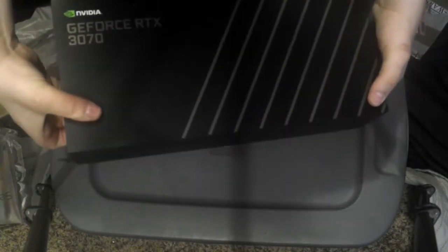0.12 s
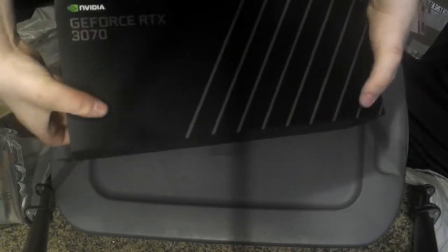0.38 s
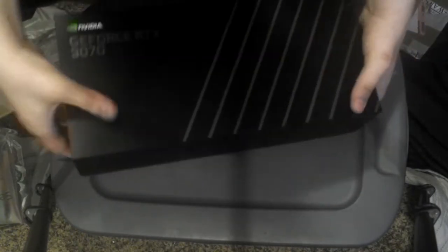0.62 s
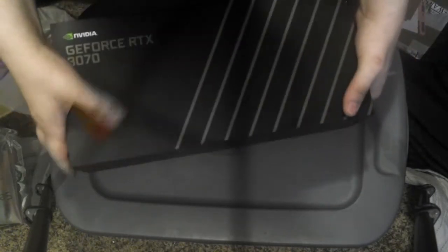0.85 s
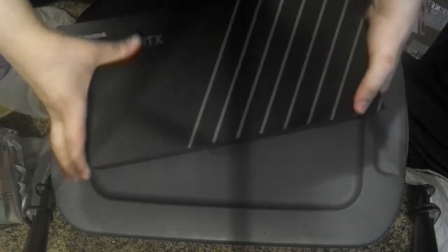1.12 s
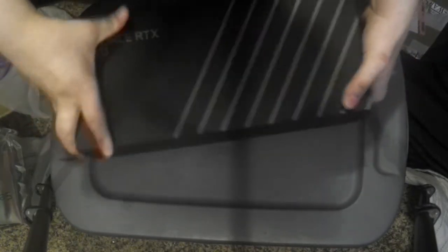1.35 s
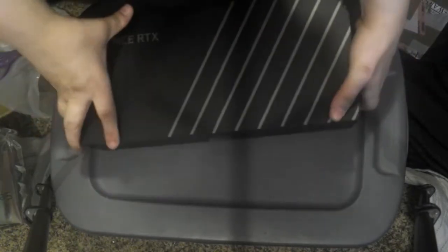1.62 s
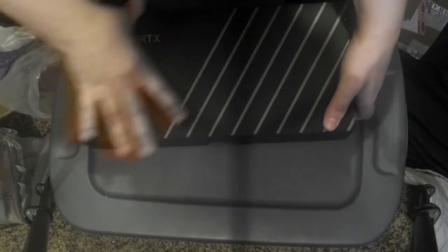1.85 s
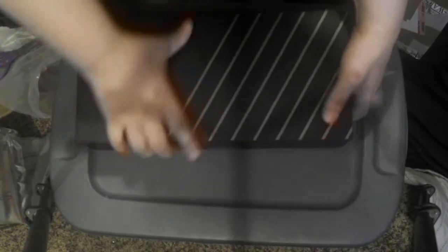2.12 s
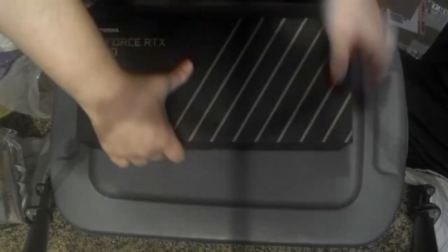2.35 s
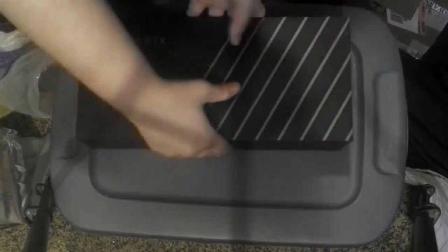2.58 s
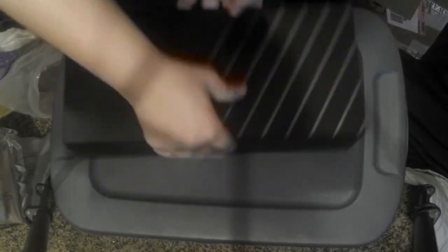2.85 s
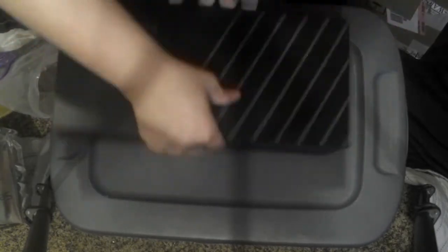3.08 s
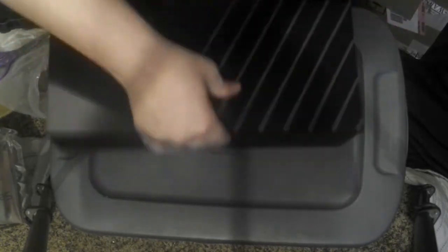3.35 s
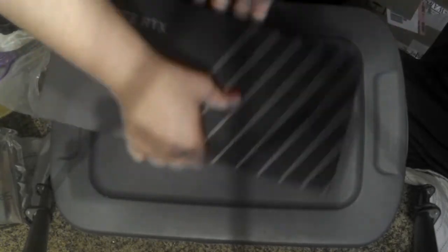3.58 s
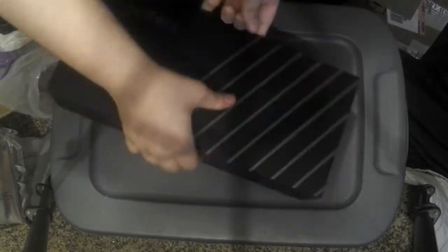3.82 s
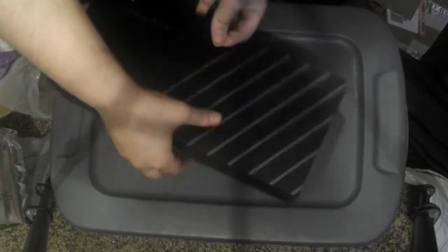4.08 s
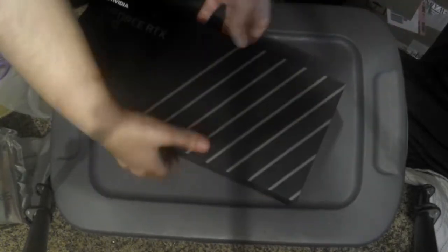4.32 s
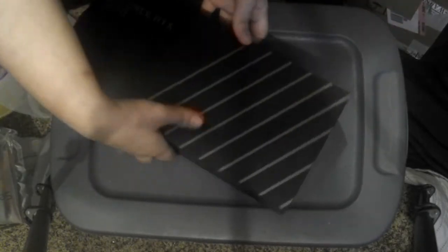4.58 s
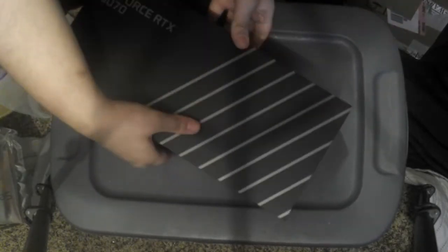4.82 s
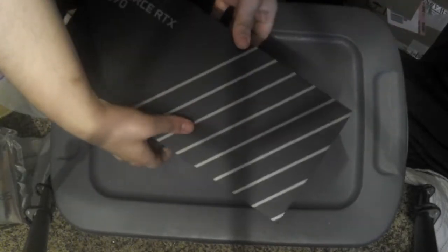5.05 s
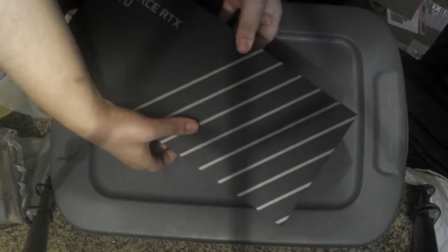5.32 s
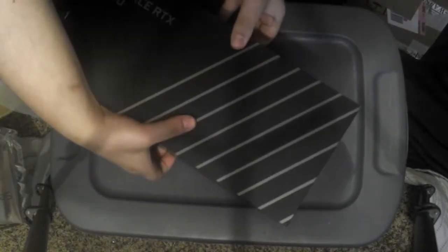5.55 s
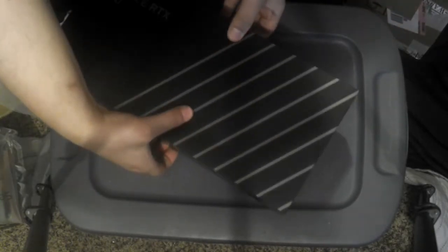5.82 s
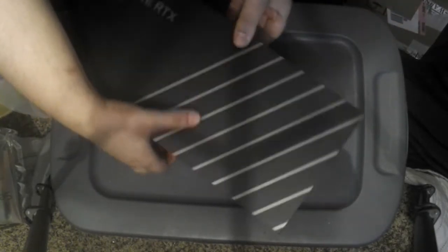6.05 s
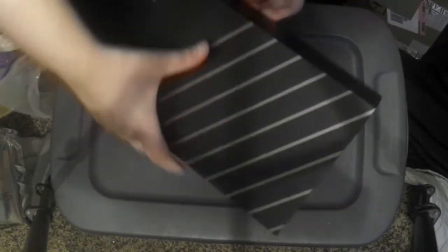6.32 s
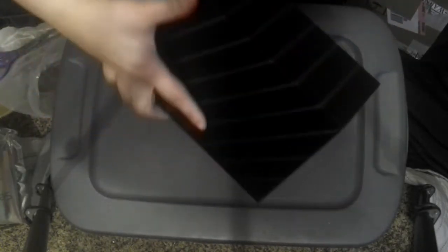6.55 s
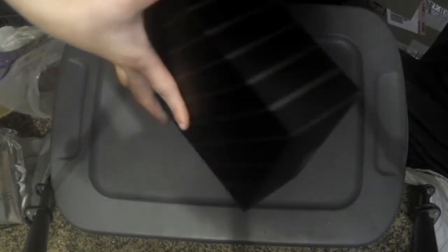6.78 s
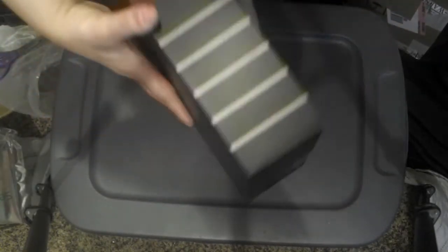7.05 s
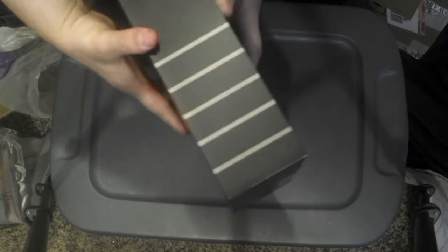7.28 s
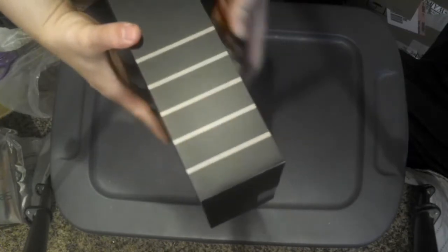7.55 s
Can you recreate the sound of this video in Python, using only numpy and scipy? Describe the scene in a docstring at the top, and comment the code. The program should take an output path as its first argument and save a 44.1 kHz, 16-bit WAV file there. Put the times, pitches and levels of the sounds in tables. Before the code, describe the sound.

Close hollow knocks and papery sliding of a box handled on a plastic tub lid, then quiet soft shifts over low fan noise.

```python
"""A cardboard box is tapped, rocked, set down and turned by hand on a hollow plastic lid, close to a small microphone.
Each contact is a first touch and a brief chatter that ring damped modes of the lid and the box panels.
Noise clicks make the snaps of corners and nails; uneven slips and a papery rasp make the sliding.
A small soft room answers with a short noise tail.
Behind it a fan hums in wandering tones and blows coloured noise, over the hiss of the preamplifier."""
import sys
import numpy as np
from scipy import signal
from scipy.fft import rfft, irfft, next_fast_len
from scipy.io import wavfile
from scipy.ndimage import uniform_filter1d

SR = 44100
rng = np.random.default_rng(int(sys.argv[2]) if len(sys.argv) > 2 else 0)


def makeup_ratio(level_db):
    """Linear amplitude ratio for a level in decibels (20 dB per factor of ten)."""
    decades = np.asarray(level_db, float) / 20
    return 10 ** decades


def materialize(psi):
    """Save the field psi as 16-bit PCM at rate SR to the path in sys.argv[1].

    A 1-D psi becomes a single channel; in a 2-D psi each row is a channel.
    """
    bounded = np.clip(np.atleast_2d(psi).T, -1, 1)
    quanta = np.round(bounded * 32767).astype(np.int16)
    wavfile.write(sys.argv[1], SR, quanta)


N = 337806  # length in samples

# Contacts of box and lid. Each row: start in seconds, peak level of the louder panel in dB,
# place in dB (upper panels over low panel), hardness in dB (knock against the panels).
CONTACTS = [(1.222, -42.5, -17, -9.5), (1.559, -17.5, -5, -9.5), (1.571, -28.5, -2, -6),
            (1.58, -29, -3, -6.5), (1.598, -32, 13, -20), (1.69, -32.5, -5.5, -10),
            (1.822, -31.5, 3.5, -13), (2.138, -44.5, -3, -2.5), (2.152, -41.5, -13, -13),
            (2.197, -32, -13, -19), (2.215, -37.5, -1, -7), (2.235, -44, 3, -14), (2.559, -32.5, 4, -8.5),
            (2.584, -37.5, -11, -7), (2.6, -23, -12, -20), (2.841, -43, -9, -16), (2.895, -32.5, 6, -14),
            (2.908, -19.5, 4.5, -12), (3.002, -31, -7, -37), (3.024, -25.5, -12, -37),
            (3.038, -27.5, -4.5, -28), (3.093, -14, 2, -13.5), (3.115, -19, -1.5, -14.5),
            (3.185, -34, 2, -32), (3.203, -25, -13, -26), (3.232, -25.5, 3, -30), (3.262, -25, 19, -19),
            (3.283, -17, 2.5, -17), (3.301, -25, 1, -17), (3.375, -26, -7, -27), (3.431, -26.5, 0, -14),
            (3.456, -16, 2.5, -15), (3.475, -27.5, 16, -11), (3.625, -39.5, -7, -9), (3.73, -38.5, 4, -17),
            (3.804, -30.5, 7, 0), (3.82, -32, -5, -16), (3.85, -40, 2, -26), (3.916, -27.5, -5, -11.5),
            (4.05, -31.5, -5, -22), (4.062, -30.5, 4, -14), (4.084, -8.5, -10, -11),
            (4.112, -5.5, -0.5, -3.5), (4.12, -3.2, 18, -12), (4.132, -26, -3, -1),
            (4.148, -17.5, -1.5, -14), (4.16, -21, 1, -1.5), (4.183, -23.5, 18, -9.5),
            (4.206, -34.5, 17, -10), (4.365, -25.5, -6.5, -10.5), (4.38, -29.5, -3, -6),
            (4.501, -35.5, -4.5, -17), (4.522, -39, -10, -14), (4.575, -35.5, -14, -18),
            (4.758, -20, 3, -17), (4.79, -39, 18, -9), (6.311, -33.5, -10, -35), (7.016, -34, -22, -17.5),
            (7.06, -37, -3, -15), (7.09, -39, -2, -14), (7.172, -36.5, -18, -18)]
# Modes of box and lid in five families: lid thump, low panel, upper panels, knock, edge tick.
# Each row: frequency in Hz, relative level within its family in dB, undamped-by-hand T60 in seconds.
BODY_MODES = [
    [(35, -6, 0.22), (60, -10, 0.14), (122, -36, 0.07), (154, -2, 0.13), (159, 8, 0.12), (200.4, 5.5, 0.13),
     (271, 5, 0.043)],
    [(343, -5.5, 0.076), (364.5, -5, 0.16), (391.7, -5.5, 0.066), (452, -3, 0.057)],
    [(513, -5.5, 0.024), (644.4, 3.5, 0.043), (700.4, 5.5, 0.078), (770, -8.5, 0.13), (833, -3, 0.078),
     (847, -8.5, 0.024), (938, -26, 0.035)],
    [(1092, 2, 0.065), (1272, 7, 0.015), (1448, 11, 0.013), (1552, -4.5, 0.012), (1665, 5.5, 0.014),
     (1783, -19, 0.014), (2020, -5.5, 0.0096), (2126, 2.5, 0.017), (2310, -14, 0.0097)],
    [(2486, 15.5, 0.013), (2700, -5, 0.0081), (2940, 7, 0.018), (3010, 2, 0.014), (3610, -1, 0.0044),
     (3910, -3, 0.0069), (4350, -26.5, 0.0018), (5160, 0, 0.0025), (5800, 0.5, 0.0072), (6780, -5, 0.0027),
     (7600, -9, .003), (8600, -19, .002), (10200, -19, .002), (12000, -20, .002), (14000, -8, .002)],
]
# How each family is struck. Each row: chatter against the first touch in dB, chatter decay in seconds,
# time the ring takes to build in seconds, time it is left to ring in seconds;
# in the contacts, the peak level scales the decay and the build time.
FAMILY_CONTACT = [(-24.5, 0.0094, 0.0013, 0.038), (-23, 0.0089, 0.0011, 0.011),
                  (-23.5, 0.011, 0.0014, 0.013), (-11.5, 0.015, 0.00039, 0.0043),
                  (2, 0.02, 0.000072, 0.0097)]
# Random spread of the mode frequencies from contact to contact, one value per family (a ratio).
MODE_SCATTER = [.012, .025, .03, .035, .035]
# How firmly the box bears on the lid; it is held clear while it is rocked.
# Each row: time in seconds, thump against the panels in dB.
BEARING_ON_LID = [(1.2, -1), (1.58, -7.5), (1.68, -13), (1.85, -13), (2.2, -4.5), (2.58, 0.5), (2.6, -26),
                  (2.85, -32), (3.1, -25.5), (3.48, -36), (3.78, -2.5), (3.92, -8), (4.08, -17),
                  (4.15, -14), (4.2, -9), (4.37, -8), (4.5, -17), (4.76, -14), (7.2, -15)]
# Hard corners and fingernails snapping on the surface.
# Each row: start in seconds, peak level in dB, centre frequency in Hz, decay in seconds.
SNAP_EVENTS = [(1.559, -32.5, 4100, 0.0018), (2.1103, -43.5, 5800, 0.0029), (2.2044, -49, 6010, 0.002),
               (3.0934, -55.5, 4000, 0.002), (3.8047, -47, 4530, 0.002), (3.915, -51, 4190, 0.002),
               (4.062, -49, 4770, 0.0014), (4.085, -31.5, 4800, 0.0025), (4.1116, -33, 4200, 0.0016),
               (4.365, -44, 4370, 0.0018), (7.204, -52, 7740, 0.002)]
# Hands and box sliding. Each row: start in seconds, length in seconds,
# gain of the drag in the panels in dB, gain of the papery rasp in dB.
SLIDES = [(0.946, .55, -63, -75), (2.094, 0.24, -56.5, -71), (2.33, 0.45, -62.5, -69.5),
          (2.836, 0.7, -55, -72.5), (3.556, 0.25, -57, -84), (4.022, 0.41, -53.5, -68),
          (4.556, 0.45, -60, -87), (5.15, 0.87, -68.5, -87), (6.151, 0.33, -59, -80),
          (6.614, 0.73, -64.5, -80), (7.155, 0.38, -62.5, -87)]
# Share of each family in the sliding sound, one level in dB per family.
SLIDE_SHARES_DB = [-14, 4, 2.5, -15, -12.5]
# Colour of the fan's air noise. Each row: frequency in Hz, relative level per Hz in dB.
AIR_COLOUR = [(15, -28), (40, -10.5), (85, -19), (150, -11.5), (265, -14), (305, -7.5), (365, 0.5),
              (420, -3.5), (475, -11.5), (560, -1.5), (760, -7), (850, -11), (1000, -20), (1250, -22.5),
              (1700, -21), (2150, -30), (2650, -30.5), (3000, -27.5), (3400, -33.5), (4200, -36),
              (9000, -41.5)]
# Mean frequencies of the steady motor and blade tones, one value in Hz per tone.
TONE_HZ = [53.6, 119.8, 161, 440, 573, 627, 680, 960]
# The same tones in the same order. Each row: rms level in dB, spread of the wander in Hz.
TONE_LEVELS = [(-63, 0.14), (-57.5, 0.056), (-86, 1), (-61.5, 1.75), (-62.5, 2.5), (-82, 1.9), (-76, 1.73),
               (-70, 2)]

SOFTER_PER_DB = 0.05  # share by which the ring builds longer per dB of peak below full scale
RATTLE_FROM_DB, RATTLE_PER_DB = -25, -0.01  # above this peak, chatter decay changes by this share per dB
TICK_DB, TICK_PER_BEARING = -7.5, 0.19  # edge tick against the knock; dB gained per dB of bearing
CRUSH_DB, CRUSH_PER_BEARING = -9, 0.18  # crushing fibres against the knock; dB gained per dB of bearing
CRUSH_RISE_S, CRUSH_S = 0.0015, 0.018  # rise, and decay before the rattle factor
CRUSH_LOW_HZ, CRUSH_TOP_HZ = 806, 4000
STROKE_ATTACK_S, STROKE_RELEASE_S = 0.034, 0.1
ROOM_DB, ROOM_T60_S, ROOM_DAMP_HZ, ROOM_BUILD_S = -16.5, 0.27, 4960, 0.0033
AIR_DB, AIR_SWAY_DB, HISS_DB = -48, 0.4, -67


def taps():
    """A first touch, then a dense dying chatter as the papery edge crushes and settles."""
    out = np.zeros(N + 2 * SR)
    t = np.arange(SR // 10) / SR
    fibres = signal.butter(2, [CRUSH_LOW_HZ, CRUSH_TOP_HZ], "band", fs=SR, output="sos")
    for start_s, peak_db, place_db, hard_db in CONTACTS:
        bearing_db = np.interp(start_s, *np.transpose(BEARING_ON_LID))
        tick_db = hard_db + TICK_DB + TICK_PER_BEARING * bearing_db
        shares_db = (bearing_db, -max(place_db, 0), min(place_db, 0), hard_db, tick_db)
        # noise whose level jumps about every millisecond
        patches_db = 2.0 * np.repeat(rng.standard_normal(len(t) // 45), 45)
        grit = rng.standard_normal(len(t)) * makeup_ratio(patches_db)
        # a gentle contact is a longer push; the chatter of a hard one dies a little sooner
        soft = 1 + SOFTER_PER_DB * max(-peak_db, 0)
        rattle = 1 + RATTLE_PER_DB * max(peak_db - RATTLE_FROM_DB, 0)

        tap = np.zeros(SR // 10 + SR // 8 - 1)
        crush_swell = (1 - np.exp(-t / CRUSH_RISE_S)) * np.exp(-t / (rattle * CRUSH_S))
        crush = signal.sosfilt(fibres, grit * crush_swell)
        crush_db = peak_db + hard_db + CRUSH_DB + CRUSH_PER_BEARING * bearing_db
        tap[:len(t)] = makeup_ratio(crush_db) * crush / np.abs(crush).max()

        families = zip(BODY_MODES, FAMILY_CONTACT, shares_db, MODE_SCATTER)
        for modes, (chatter_db, chatter_s, build_s, hold_s), share_db, scatter in families:
            push = makeup_ratio(chatter_db) * grit * np.exp(-t / (rattle * chatter_s))
            push[0] = -1  # the first touch
            # random spread of mode frequencies and levels from contact to contact
            detune, level = rng.standard_normal((2, 16))
            response = ring(modes, scatter * detune, 2.0 * level, soft * build_s, hold_s)
            sound = signal.fftconvolve(push, response)
            tap = tap + makeup_ratio(peak_db + share_db) * sound / np.abs(sound).max()
        # each contact gets its own freshly drawn noise tail
        tap = room(tap)
        at = int(start_s * SR)
        out[at:at + len(tap)] += tap
    return out[:N]


def ring(modes, detune, level_db, build_s, hold_s):
    """Impulse response of damped modes, each with its given frequency shift (a ratio) and level offset."""
    hz, db, t60 = (np.array(column)[:, None] for column in zip(*modes))
    t = np.arange(SR // 8) / SR
    count = len(modes)
    decay = makeup_ratio(-60 * t / np.maximum(t60, 0.001))
    waves = np.sin(2 * np.pi * hz * (1 + detune[:count, None]) * t) * decay
    # bending waves need a moment to spread over the panel; then the gripping hand smothers them
    swell = (1 - np.exp(-(t / build_s) ** 2)) * np.exp(-(t / hold_s) ** 2)
    sound = np.sum(makeup_ratio(db + level_db[:count, None]) * waves, axis=0) * swell
    # below its first mode a panel pushes no air
    low_cut = signal.butter(4, 0.86 * hz.min(), "high", fs=SR, output="sos")
    return signal.sosfilt(low_cut, sound)


def snaps():
    """Hard corners and nails snap: each a broad noise click of a few milliseconds."""
    out = np.zeros(N)
    t = np.arange(SR // 25) / SR
    for start_s, peak_db, hz, decay_s in SNAP_EVENTS:
        band = signal.butter(2, [0.42 * hz, 1.5 * hz], "band", fs=SR, output="sos")
        click = signal.sosfilt(band, rng.standard_normal(len(t)) * np.exp(-t / decay_s))
        at = int(start_s * SR)
        out[at:at + len(t)] += makeup_ratio(peak_db) * click / np.abs(click).max()
    return out


def rub():
    """Dense uneven slips excite the same body while hands and box slide."""
    happens = rng.random(N) < 1500 / SR  # about 1500 slips per second
    slips = happens * rng.standard_normal(N) * makeup_ratio(4.0 * walk(30))
    out = 0
    for modes, share_db, contact in zip(BODY_MODES, SLIDE_SHARES_DB, FAMILY_CONTACT):
        _, _, build_s, hold_s = contact
        response = ring(modes, np.zeros(16), np.zeros(16), build_s, hold_s)
        sound = signal.fftconvolve(slips, response)[:N]
        out = out + makeup_ratio(share_db) * sound / np.std(sound)
    return out * strokes(column=2)


def brush():
    """A fine papery rasp of band noise, patchy as the fingers drag."""
    band = signal.butter(2, [2200, 7500], "band", fs=SR, output="sos")
    rasp = signal.sosfilt(band, rng.standard_normal(N))
    return rasp / np.std(rasp) * makeup_ratio(2.2 * walk(40)) * strokes(column=3)


def strokes(column):
    """Gain of all slides: each rises, holds and fades within its length."""
    t = np.arange(N) / SR
    gain = np.zeros(N)
    for row in SLIDES:
        start_s, length_s = row[:2]
        rise = (t - start_s) / STROKE_ATTACK_S
        fade = (start_s + length_s - t) / STROKE_RELEASE_S
        gain += makeup_ratio(row[column]) * np.clip(np.minimum(rise, fade), 0, 1)
    return gain


def room(x):
    """A small soft room: the direct sound, then a dense tail that builds after the first walls and lacks treble."""
    t = np.arange(SR // 2) / SR
    build = np.clip(t / ROOM_BUILD_S, 0, 1)
    tail = rng.standard_normal(len(t)) * makeup_ratio(-60 * t / ROOM_T60_S) * build
    tail = signal.sosfilt(signal.butter(1, ROOM_DAMP_HZ, fs=SR, output="sos"), tail)
    tail *= makeup_ratio(ROOM_DB) / np.sqrt(np.sum(tail ** 2))
    tail[0] = 1  # direct sound
    return signal.fftconvolve(x, tail)


def fan():
    """Air noise that breathes a little, with motor and blade tones that wander."""
    air = shaped(AIR_COLOUR) * makeup_ratio(AIR_DB + AIR_SWAY_DB * walk(1.91) + 0.25 * walk(14.0))
    tones = np.zeros(N)
    for hz, (rms_db, wander_hz) in zip(TONE_HZ, TONE_LEVELS):
        cycles = rng.random() + np.cumsum(hz + wander_hz * walk(6)) / SR
        tones += np.sqrt(2) * makeup_ratio(rms_db) * np.sin(2 * np.pi * cycles)
    return air + tones


def shaped(table):
    """Noise of rms 1 whose spectrum follows a (Hz, dB) colour."""
    hz, db = np.transpose(table)
    size = next_fast_len(N)
    log_hz = np.log(np.fft.rfftfreq(size, 1 / SR) + 1)
    colour = makeup_ratio(np.interp(log_hz, np.log(hz), db))
    noise = irfft(rfft(rng.standard_normal(size)) * colour, size)[:N]
    return noise / np.std(noise)


def walk(rate):
    """Random levels held 1 / rate s and smoothed twice by a moving average; spread near 1."""
    hold = int(SR / rate)
    steps = np.repeat(rng.standard_normal(N // hold + 1), hold)
    return 1.305 * uniform_filter1d(uniform_filter1d(steps, hold), hold)[:N]


def scene():
    """Handling sounds in their room, over the fan."""
    handling = snaps() + rub() + brush()
    return (taps() + room(handling)[:N] + fan())[None]


def roll_off(x):
    """The treble ends steeply here."""
    return signal.sosfilt(signal.butter(12, 15750, fs=SR, output="sos"), x)


def record(dry):
    """Close microphone: flat preamplifier hiss is added and peaks are clipped at full scale."""
    hiss = makeup_ratio(HISS_DB) * rng.standard_normal(dry.shape)
    mix = np.clip(dry + hiss, -1, 1)
    return roll_off(mix)


dry = scene()
out = record(dry)
materialize(out)
```